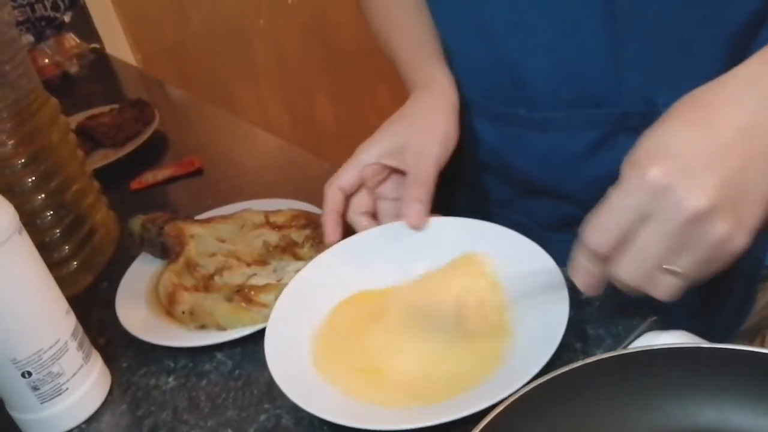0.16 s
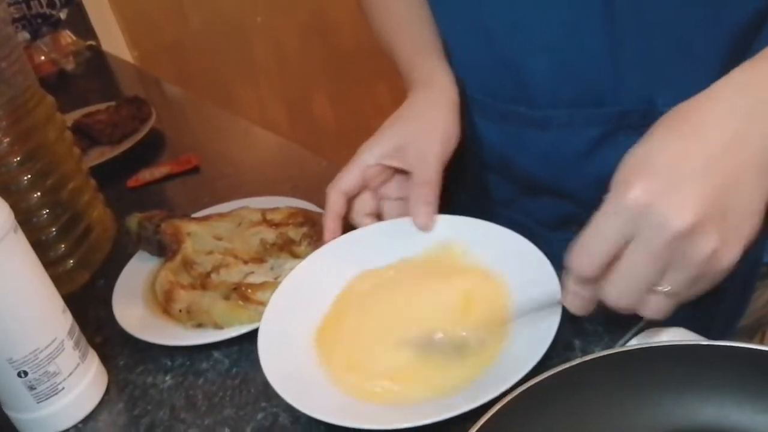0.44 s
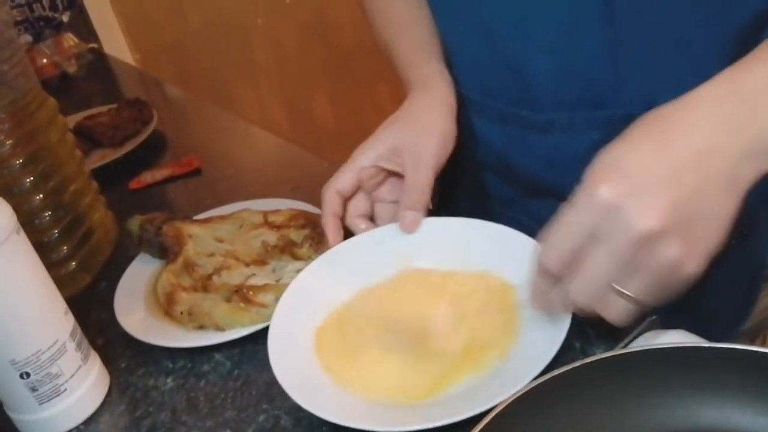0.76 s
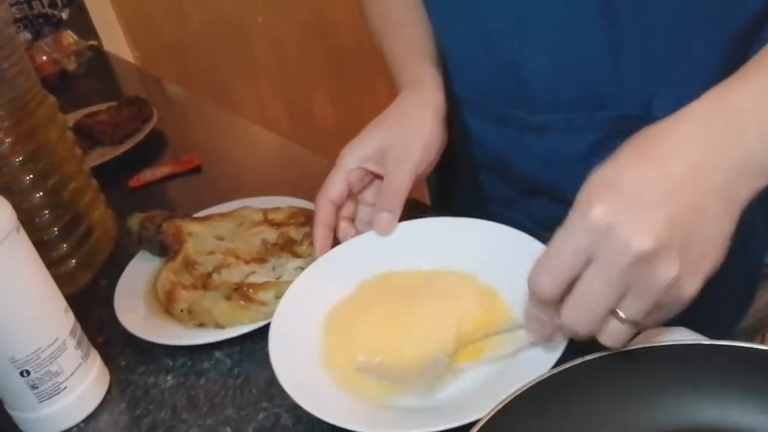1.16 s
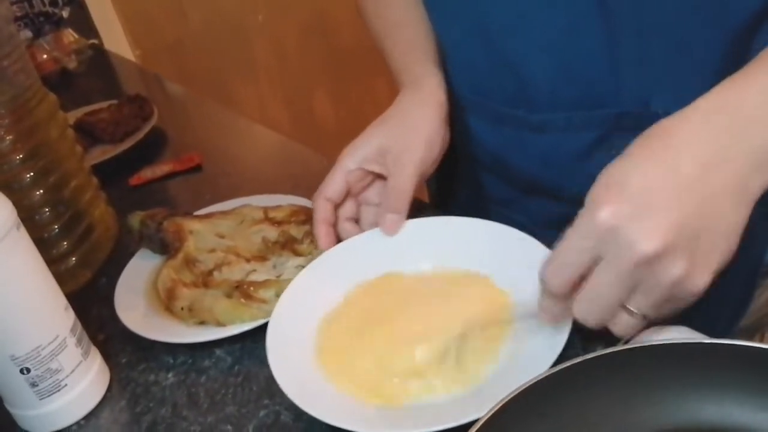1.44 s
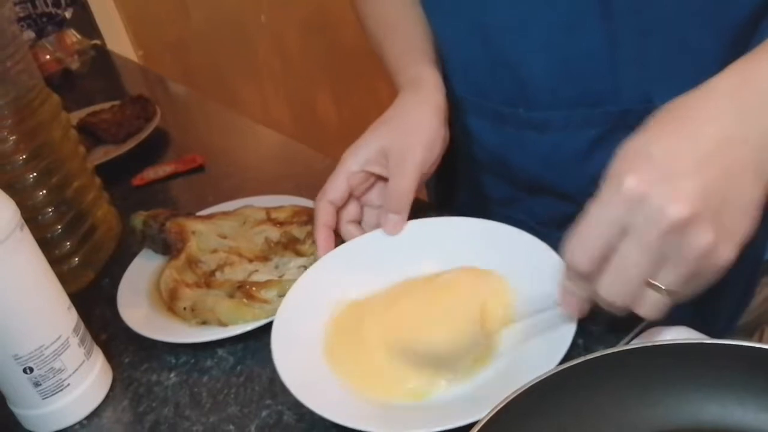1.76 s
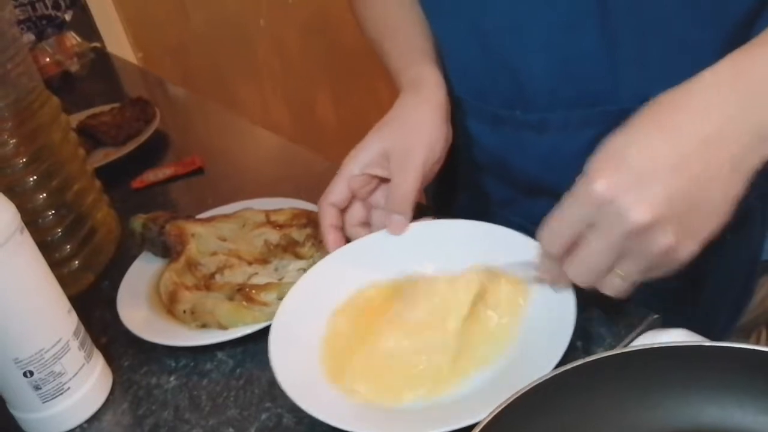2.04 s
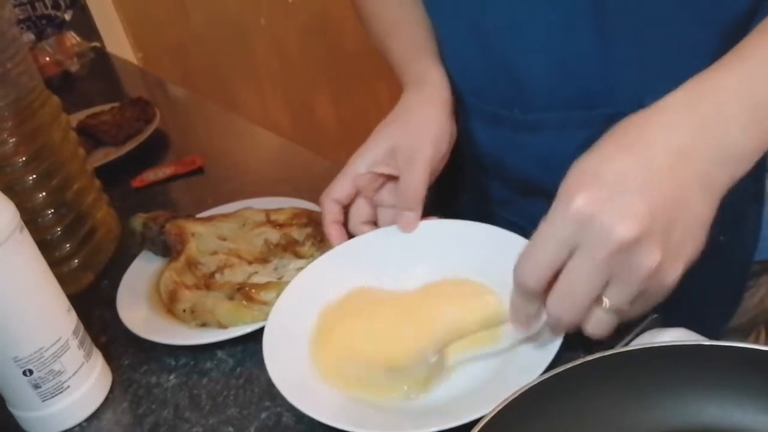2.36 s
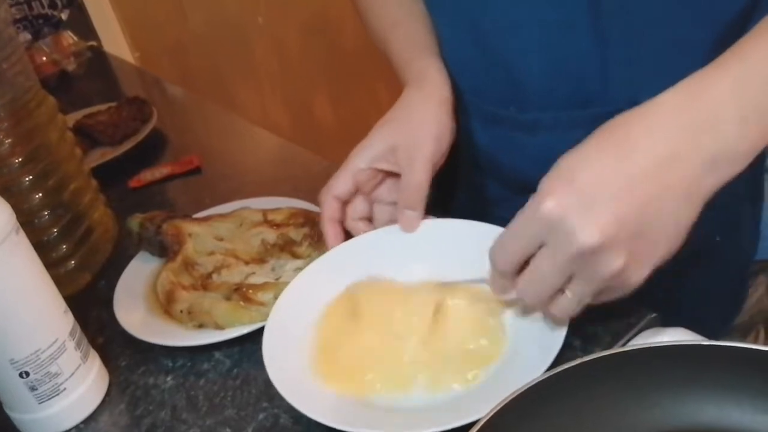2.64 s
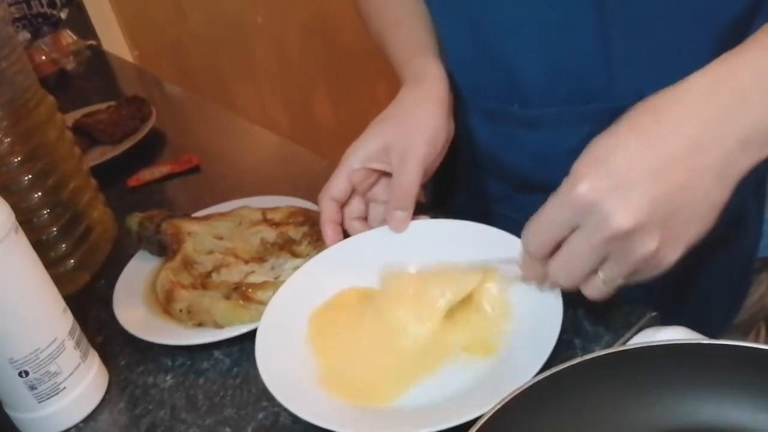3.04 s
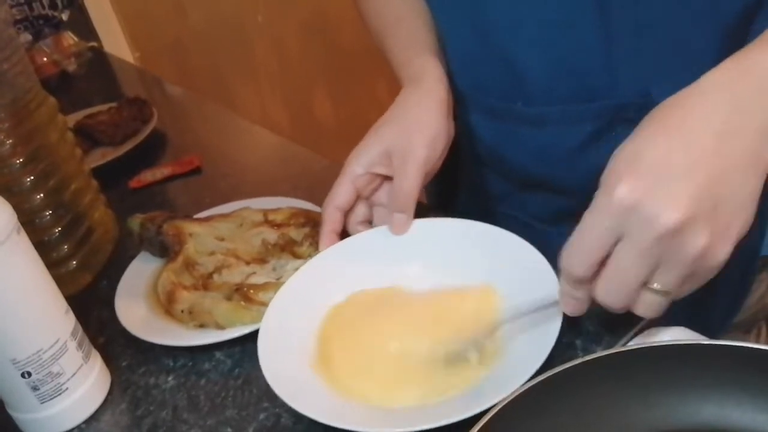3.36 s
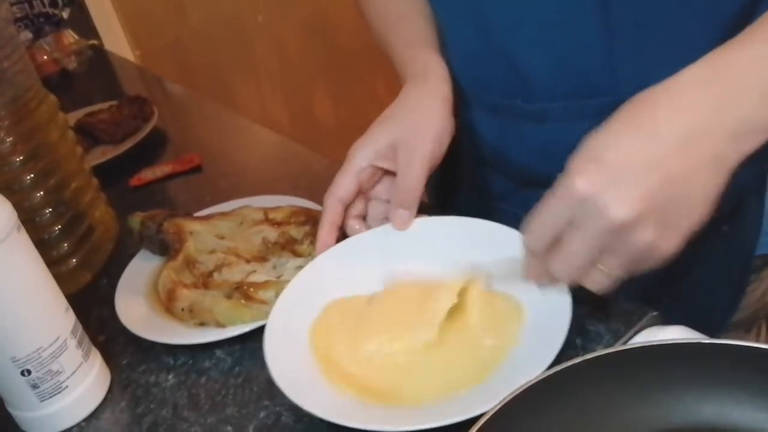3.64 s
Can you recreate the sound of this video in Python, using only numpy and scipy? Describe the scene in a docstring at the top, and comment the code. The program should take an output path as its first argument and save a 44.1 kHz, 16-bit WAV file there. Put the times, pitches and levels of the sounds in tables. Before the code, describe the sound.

A fork beats raw egg in a ceramic plate, about five sharp metallic clacks a second, with lighter scrapes and wet slops between, close up in a small, slightly echoing kitchen over faint hum.

```python
"""In a small kitchen, a fork beats raw egg in a ceramic plate, about five strokes a second.
Each stroke skids in and clacks: clicks of noise excite the plate and the steel tines, ringing near 6.7 kHz,
and a decaying diffuse field gives the room's answer. Between strokes the tines graze the plate with
weaker clicks; the egg slops and crackles as filtered splashes and struck resonators.
Underneath lie a wavering mains hum, a sine, and faint room noise."""
import sys
import numpy as np
from scipy import signal
from scipy.fft import rfft, irfft
from scipy.io import wavfile
from scipy.ndimage import uniform_filter1d

SR = 44100
rng = np.random.default_rng(int(sys.argv[2]) if len(sys.argv) > 2 else 0)


def log_audio(samples):
    """Write samples as a 16-bit WAV file to the path given in sys.argv[1]."""
    # one column per channel
    frames = np.atleast_2d(samples).T
    # limit to full scale, then quantise
    limited = np.clip(frames, -1, 1)
    pcm = np.round(limited * 32767).astype(np.int16)
    wavfile.write(sys.argv[1], SR, pcm)


N = 167580  # samples in the scene
SIZE = 20000  # samples in one stroke, graze or slop
T = np.arange(SIZE) / SR
HZ = np.maximum(np.arange(SIZE // 2 + 1) * SR / SIZE, 1)
LEAD_S = .008  # room for the skid ahead of the blow

# centres of the six parts of a stroke, thud, knock, clack, crack, tine ring, tick: f/Hz
PART_HZ = [480, 1150, 3000, 5000, 6900, 10500]
# strokes: t/s, levels of thud, knock, clack, crack, tine ring and tick/dB, left over right/dB,
# thud f/Hz, clack f/Hz, tine f/Hz
STROKES = [(-0.085, 2, 13.5, 0.5, 0.5, 0.5, 0.5, -1, 480, 2920, 6500),
           (0.1096, -4.5, 5, 2, 5, 2.5, 2, 0.5, 484, 2850, 6635),
           (0.3127, 0.5, 5.5, -1.5, 5, 6.5, 2, -0.5, 466, 2760, 6625),
           (0.506, 3.5, 0.5, -1, 3, 0, 0, 0.5, 485, 2960, 6680),
           (0.696, -2.5, -6, -3.5, 2.5, 6, 1, -1, 499.5, 2780, 6630),
           (0.898, -0.5, -1.5, -1.5, 1.5, 4.5, 3, 3.5, 587, 3370, 6570),
           (1.086, -0.5, -3.5, 0, 4, -0.5, 0, 6, 522, 3220, 6840),
           (1.2852, 1.5, -3.5, -0.5, 6, 2, 0.5, 3, 584, 3260, 6560),
           (1.48, 4, 0, 5.5, 10, 3, 4, 1, 491, 2320, 6850),
           (1.689, 4.5, 7.5, 2.5, 9.5, 3, 1.5, 2, 477, 3180, 6790),
           (1.886, 2, 3.5, 1.5, 3.5, 0.5, 3, 1.5, 476, 2170, 6690),
           (2.081, 1.5, 6.5, -1.5, 3.5, 3, -1, -2.5, 482, 3000, 6566),
           (2.274, 2.5, 8.5, 0.5, 9.5, 3.5, 2, -0.5, 485, 3120, 6740),
           (2.461, 3, 7.5, 2.5, 5.5, 6, 3.5, -3, 463, 3080, 6640),
           (2.651, -1, 6.5, 3.5, -2, 5, 2.5, -1, 477.7, 3240, 6930),
           (2.8401, 3, -2, -3.5, 2, 0, 0.5, 1, 478, 2800, 6730),
           (3.040, 0.5, 3.5, 1, 3, 4, 4.5, 1, 483, 2820, 6830),
           (3.229, -1, -1, 0.5, -1, -1, -0.5, -0.5, 461, 3230, 6730),
           (3.431, -5, 3.5, -1, 1.5, 1, -3, -0.5, 611, 3040, 6606),
           (3.6253, -6, 4.5, -2.5, -0.5, 4.5, -1.5, 1, 484, 3240, 6686)]
# light grazes of the tines: t/s, level/dB, brightness/(dB per octave), t60/s
GRAZES = [(0.2073, -17.5, -2, 0.026), (1.2527, -12.5, 6, 0.031), (1.2682, -9, 1.5, 0.013),
          (1.558, -7, 1, 0.014), (2.074, -13.5, 3, 0.025), (2.2646, -14.5, 3, 0.019), (2.271, -9, 1, 0.012),
          (2.8183, -13.5, 8, 0.007), (3.205, -23, 9, 0.024), (3.411, -15.5, 1.5, 0.025),
          (3.4173, -7, 2, 0.0057), (3.601, -7.5, 3, 0.011)]
# larger slops of egg: t/s, level/dB, f/Hz
SLOPS = [(1.14, -6, 1510), (1.482, -8, 267), (1.647, -2.5, 786), (1.653, -2.5, 455), (1.691, -11, 92),
         (1.69, -7.5, 260), (1.81, -2.5, 460), (1.81, -6, 211), (1.888, 11, 807), (1.896, -4.5, 232),
         (2.195, -6.5, 760), (2.355, -3, 870)]
# broad colour of fork on plate: f/Hz, level/dB
COLOUR = [(41, -19.5), (152, -16), (335, -13.5), (605, -9), (1110, -10.5), (1910, -8.5), (2810, -3),
          (3910, -13), (5010, -9), (5910, -15.5), (7310, 2.5), (9110, -15), (10510, -11.5), (12910, -12.5),
          (14010, -79)]
# resonances of plate and fork: f/Hz, width before sharpening/Hz, mean level/dB
RESONANCES = [(455, 89, -2), (798, 24.3, 2.5), (906, 137, -4.5), (1417, 81, -8.5), (3067, 470, 2.5),
              (5438, 91, -2), (6010, 21, -1.5), (7320, 130, -1.5), (8337, 127, 0), (10630, 460, -4.5)]
# clean ring of the thud, clack and tine modes: level before the stroke's own/dB, t60/s
RINGS = [(-45.5, .22), (-37, 0.016), (-44.5, 0.19)]
# kitchen: f/Hz, reverberation against direct sound/dB, t60/s
REVERB = [(152, -3.5, 0.42), (485, 0.5, 0.35), (1370, 0.5, 0.28), (3400, -7, 0.37), (5360, -4.5, 0.45),
          (6850, -2.5, 0.31), (8140, -7.5, 0.37), (13000, -7, 0.24)]
# side against mid: f/Hz, level/dB
SPREAD = [(102, -8.5), (305, -0.5), (505, -5), (1010, 1), (2510, -0.5), (5010, 0), (6610, 1), (9010, 1),
          (13010, 0.5)]
# wet crackle of the egg: f/Hz, level/dB
SQUELCH = [(102, -15), (252, -5), (505, 2.5), (905, -5.5), (2010, -2.5), (5010, -24), (9010, -33)]
# spectrum of the room noise: f/Hz, relative level/dB
AIR = [(21, 8), (61, -0.5), (122, 16), (202, 2), (505, -2), (1510, -32), (5010, -46), (12010, -26)]
# hum before the left-right trim: t/s, rms level/dB
HUM_LEVEL = [(0, -74), (.45, -64.5), (.75, -73.5), (1.25, -62.5), (1.7, -73), (2.2, -71.5), (2.8, -71),
             (3.8, -71)]

# contact: skid time and level, onset time, decay of body and top, scatter of click levels
SLIDE_S, SLIDE_DB, ATTACK_S = 0.0023, -20.5, 0.00067
RATTLE_T60_S, TICK_T60_S, CLICK_SPREAD_DB = 0.033, 0.019, 6.5
# tine and clack peaks (bands before doubling and sharpening), random stir of resonance levels
TINE_BAND_HZ, TINE_PEAK_DB, STIR_DB = 174, 10.5, 2
CLACK_BAND_HZ, CLACK_PEAK_DB = 104, 5
TINE_SPAN_S, TINE_FOLLOW_DB = .0035, -3.5  # later tines: time span, level against the first
BUILD_UP_S = 0.014  # growth of the room's answer
# egg: crackle level, mean pop rate, spread of pop levels, room against direct pops
WET_DB, POPS_PER_S, POP_SPREAD_DB, POP_ROOM_DB = -67, 160, 3, 9
SWISH_LAG_S, SWISH_S = 0.081, 0.088  # sweep after each blow: delay, half-duration to 1/e
HUM_HZ, AIR_DB = 100, -73  # room noise rms before the left-right trim
STOPBAND_HZ = 14400


def strokes():
    """Impact excitation: each turn of the wrist hits the plate once, at a new spot with new mode pitches."""
    out = np.zeros((2, N))
    for s, *parts_db, pan_db, thud_hz, clack_hz, tine_hz in STROKES:
        balance_db = np.interp(np.log(HZ), np.log(PART_HZ), parts_db)
        gain = body(tine_hz, clack_hz) * from_db(balance_db)
        force = stereo(rattle() + kitchen())
        sound = irfft(force * tines() * causal(gain))
        mode_hz = (thud_hz, clack_hz, tine_hz)
        mode_parts_db = parts_db[::2]  # thud, clack, tine ring
        for hz, part_db, (ring_db, t60) in zip(mode_hz, mode_parts_db, RINGS):
            sound = sound + from_db(part_db + ring_db) * ring(hz, t60)
        pan = from_db([[pan_db / 2], [-pan_db / 2]])
        add(out, s - LEAD_S, sound * pan)
    return out


def rattle():
    """Frequency-dependent damping: the top of a blow's rattle dies sooner than its body."""
    top = np.clip(HZ / 4000 - 1.5, 0, 1)
    return np.sqrt(1 - top) * chatter(RATTLE_T60_S) + np.sqrt(top) * chatter(TICK_T60_S)


def chatter(t60):
    """Intermittent contact force: a short skid, then a run of uneven clicks that rattles out."""
    age = T - LEAD_S
    after = np.maximum(age, 0)
    blow = (1 - np.exp(-after / ATTACK_S)) * from_db(-60 * after / t60)
    skid = from_db(SLIDE_DB) * np.exp(-abs(age) / SLIDE_S)
    noise = rng.standard_normal((2, SIZE))
    click_db = CLICK_SPREAD_DB * np.minimum(rng.standard_normal(SIZE), 2)
    return evened(noise * from_db(click_db) * (blow + skid))


def tines(count=4, ripple_depth=1.5):
    """Comb interference: one contact leads and others follow within milliseconds, a new metallic colour."""
    lags = TINE_SPAN_S * (np.arange(count) + rng.random(count)) / count
    followers = from_db(TINE_FOLLOW_DB) * rng.choice([-1, 1], count)
    hits = 1 + followers @ np.exp(-2j * np.pi * np.outer(lags, HZ))
    ripple = abs(hits) ** (ripple_depth * np.clip(HZ / 3500, 0, 1))
    return causal(ripple / np.sqrt(uniform_filter1d(ripple ** 2, size=400)))


def body(tine_hz, clack_hz=None):
    """Modal response of plate and fork; a full blow adds a clack whose pitch depends on where it lands."""
    power = from_db(at_hz(COLOUR)) ** 2
    power = power + from_db(TINE_PEAK_DB) ** 2 * peak(tine_hz, 2 * TINE_BAND_HZ) ** 2
    if clack_hz:
        power = power + from_db(CLACK_PEAK_DB) ** 2 * peak(clack_hz, 2 * CLACK_BAND_HZ) ** 2
    for hz, width, db in RESONANCES:
        stirred_db = db + STIR_DB * rng.standard_normal()
        power = power + from_db(stirred_db) ** 2 * peak(hz, width) ** 1.5
    return np.sqrt(power)


def peak(hz, width_hz):
    """Simple resonance: the power response of one damped mode."""
    return 1 / (1 + ((HZ ** 2 - hz ** 2) / (HZ * width_hz)) ** 2)


def ring(hz, t60):
    """Free decay of one mode; the higher it is, the more its phase may differ between left and right."""
    age = np.maximum(T - LEAD_S, 0)
    phase = 2 * np.pi * (rng.random() + rng.random((2, 1)) * min(hz / PART_HZ[2], 1))
    envelope = (1 - np.exp(-age / ATTACK_S)) * from_db(-60 * age / t60)
    return np.sin(2 * np.pi * hz * age + phase) * envelope


def grazes(tine_hz=6760, room_db=-2, tilt_pivot_hz=6050):
    """Weak contact excitation: light touches of the tines, mostly just before a stroke."""
    out = np.zeros((2, N))
    for s, db, tilt_db, t60 in GRAZES:
        octaves = np.log2(np.maximum(HZ, 510) / tilt_pivot_hz)
        gain = body(tine_hz) * from_db(db + tilt_db * octaves)
        force = stereo(chatter(t60) + from_db(room_db) * kitchen())
        add(out, s - LEAD_S, irfft(force * tines() * causal(gain)))
    return out


def slops(t60=.04, width_hz=110, note_db=-46, note_t60=.11):
    """Cavity resonance: pockets of air close in the egg, a short splash with a hollow note."""
    out = np.zeros((2, N))
    for s, db, hz in SLOPS:
        splash = irfft(stereo(chatter(t60) + kitchen()) * causal(peak(hz, width_hz)))
        note = from_db(note_db) * ring(hz, note_t60)
        add(out, s - LEAD_S, from_db(db) * (splash + note))
    return out


def egg(cycles=11, count=20):
    """Bubble resonance: small bubbles and threads pop, hardest as the fork sweeps through after each blow."""
    t = np.arange(N) / SR
    swish = .5 + sum(np.exp(-((t - s - SWISH_LAG_S) / SWISH_S) ** 2) for s, *_ in STROKES)
    sizes = from_db(POP_SPREAD_DB * np.minimum(rng.exponential(1, N), 4)) * rng.choice([-1, 1], N)
    clicks = swish * sizes * (rng.random(N) < POPS_PER_S / SR)
    dealt = rng.integers(0, count, N)  # which resonator each click strikes
    pops = 0
    for k, hz in enumerate(np.geomspace(270, 5200, count)):
        r = from_db(-60 * hz / (cycles * SR))  # 60 dB down after so many cycles
        w = 2 * np.pi * hz / SR
        struck = clicks * (dealt == k) + 1e-18
        pops = pops + signal.lfilter([w, 0, -w], [1, -2 * r * np.cos(w), r * r], struck)
    room = irfft(stereo(kitchen()))[:, int(LEAD_S * SR):]
    wet = signal.fftconvolve(pops[None], room, axes=1)[:, :N]
    return from_db(WET_DB) * coloured(pops + from_db(POP_ROOM_DB) * wet, SQUELCH)


def kitchen():
    """Diffuse reverberation: the room's noise-like response builds up, then dies band by band."""
    white = rfft(rng.standard_normal((2, SIZE)))
    age = np.maximum(T - LEAD_S, 0)
    centres = np.log(np.array(REVERB)[:, 0])
    tail = 0
    for share, (_, _, t60) in zip(np.eye(len(REVERB)), REVERB):
        band = irfft(white * np.interp(np.log(HZ), centres, share))
        tail = tail + band * from_db(-60 * age / t60)
    build_up = 1 - np.exp(-(age / BUILD_UP_S) ** 2)
    return evened(tail * build_up) * from_db(at_hz(REVERB))


def background(apart_share=0.66):
    """Stationary noise and a pure tone: faint, partly correlated room noise and a wavering mains hum."""
    t = np.arange(N) / SR
    hum_rms = from_db(np.interp(t, *np.transpose(HUM_LEVEL)))
    hum = hum_rms * np.sqrt(2) * np.sin(2 * np.pi * HUM_HZ * t)
    noise = rng.standard_normal(N) + apart_share * rng.standard_normal((2, N))
    air = from_db(AIR_DB) * coloured(noise, AIR)
    return (hum + air) * from_db([[.9], [-.9]])


def from_db(db):
    """Logarithmic level: decibels to amplitude gain."""
    return 10 ** (np.asarray(db) / 20)


def at_hz(points, hz=HZ, axis=1):
    """Logarithmic pitch scale: read a table column along log frequency."""
    points = np.array(points)
    return np.interp(np.log(hz), np.log(points[:, 0]), points[:, axis])


def rms_one(x):
    """Effective value: scale to unit rms."""
    return x / np.sqrt(np.mean(x ** 2) + 1e-20)


def add(out, s, sound):
    """Superposition: mix a sound in at a time."""
    i = int(round(s * SR))
    a, b = max(i, 0), min(i + sound.shape[-1], N)
    out[:, a:b] += sound[:, a - i:b - i]


def causal(gain):
    """Causality: the minimum-phase response of this magnitude, whose peaks ring after the blow."""
    cepstrum = irfft(np.log(gain + 1e-6))
    cepstrum[1:SIZE // 2] *= 2
    cepstrum[SIZE // 2 + 1:] = 0
    return np.exp(rfft(cepstrum))


def evened(x, size=150):
    """Spectral whitening: noise-burst spectra levelled to about unit energy in every broad band."""
    spectra = rfft(x)
    return np.array([s * causal(uniform_filter1d(abs(s) ** 2, size) ** -.5) for s in spectra])


def stereo(spectra):
    """Sum and difference: two unrelated spectra serve as mid and side, giving left and right."""
    width = from_db(at_hz(SPREAD))
    mid, side = spectra / np.sqrt(1 + width ** 2)
    return np.array([mid + width * side, mid - width * side])


def coloured(x, spectrum):
    """Linear filtering: shape long stereo signals by a spectrum, at unit rms."""
    response = irfft(causal(from_db(at_hz(spectrum))))
    return rms_one(signal.fftconvolve(x, response[None], axes=1)[:, :N])


def scene():
    """Superposition of fork, egg and kitchen."""
    return strokes() + grazes() + slops() + egg() + background()


def record(dry):
    """Low-pass filtering: the top is cut steeply, by 60 dB at the stopband edge."""
    return signal.sosfilt(signal.cheby2(16, 60, STOPBAND_HZ, fs=SR, output="sos"), dry)


dry = scene()
out = record(dry)
log_audio(out)
```